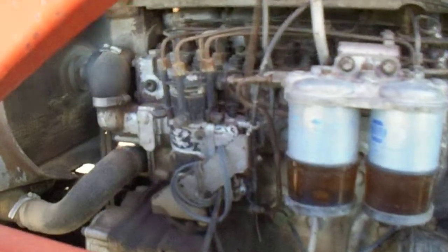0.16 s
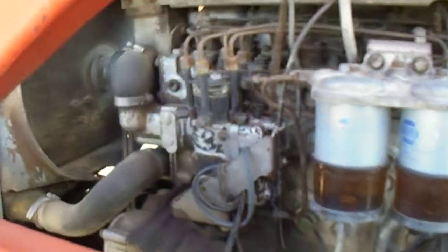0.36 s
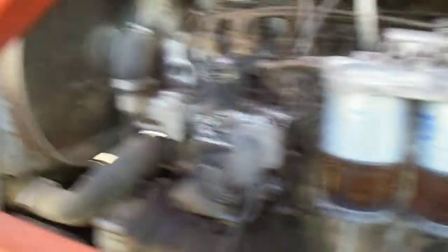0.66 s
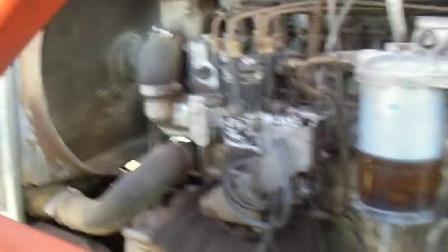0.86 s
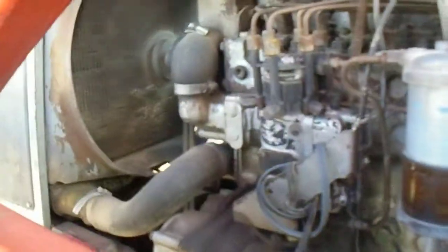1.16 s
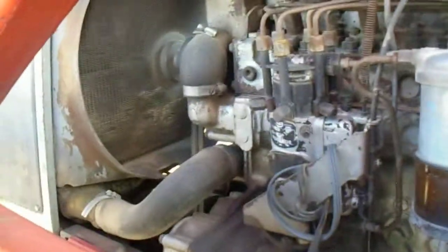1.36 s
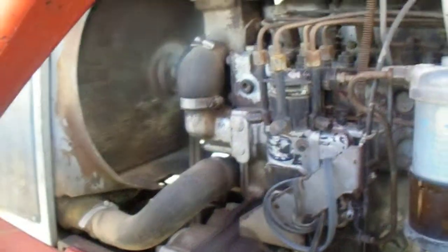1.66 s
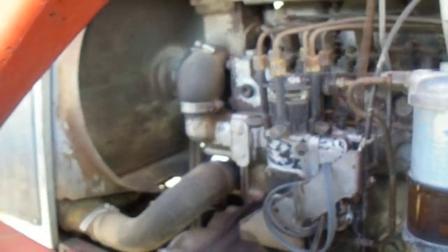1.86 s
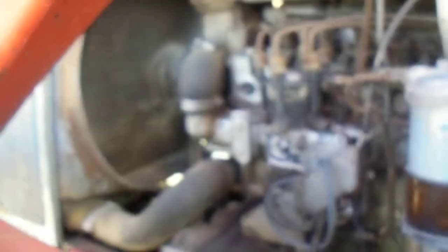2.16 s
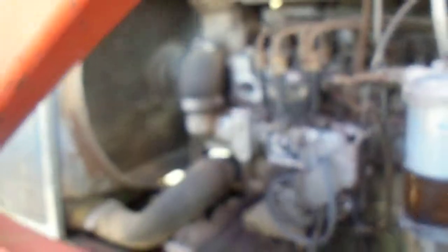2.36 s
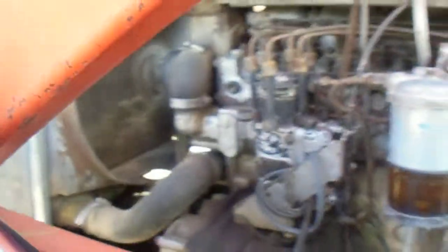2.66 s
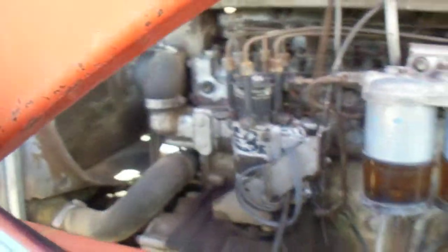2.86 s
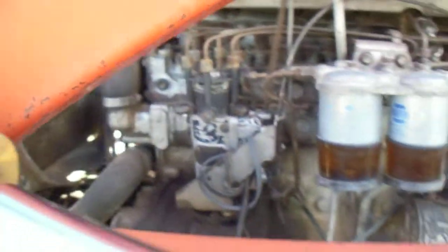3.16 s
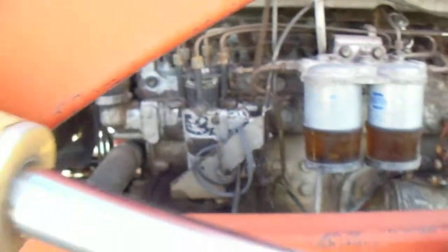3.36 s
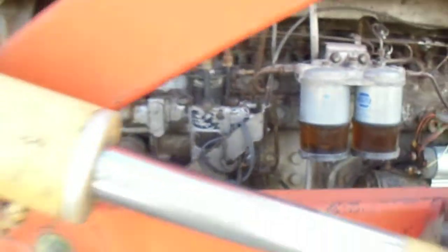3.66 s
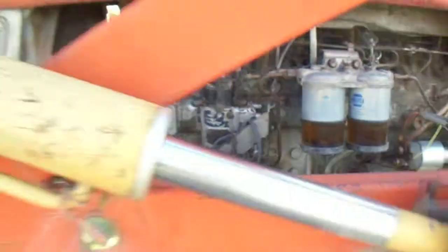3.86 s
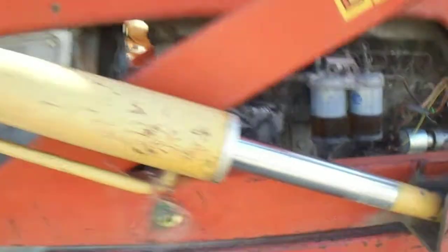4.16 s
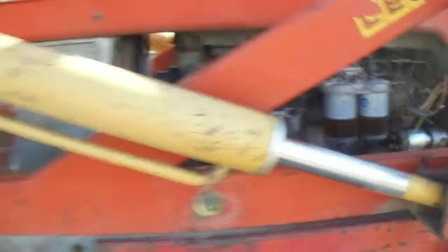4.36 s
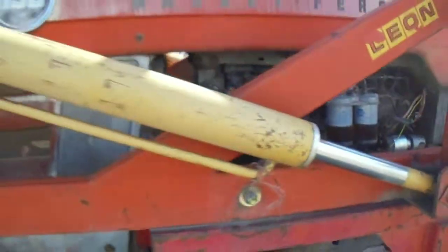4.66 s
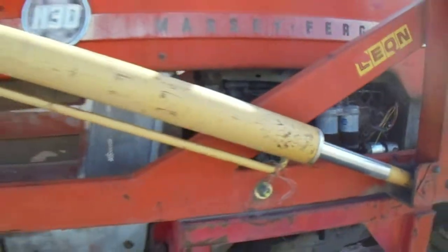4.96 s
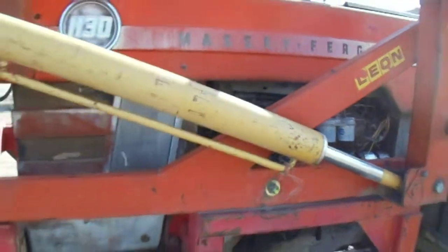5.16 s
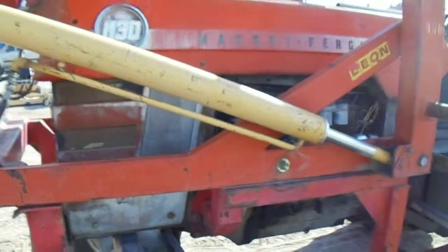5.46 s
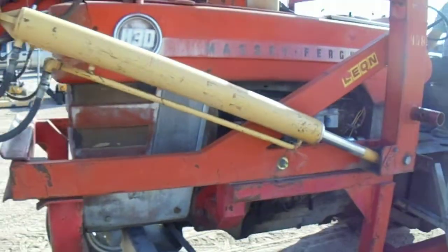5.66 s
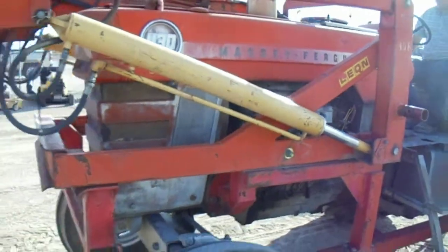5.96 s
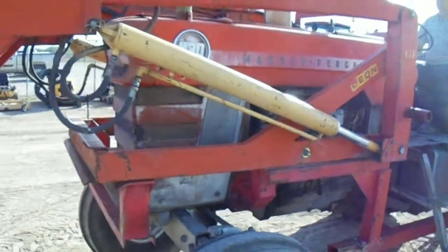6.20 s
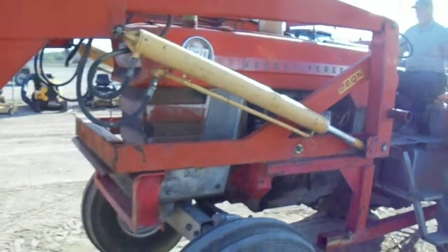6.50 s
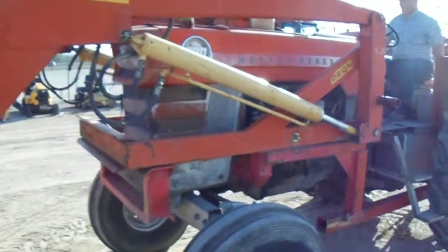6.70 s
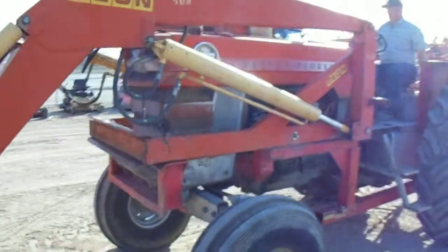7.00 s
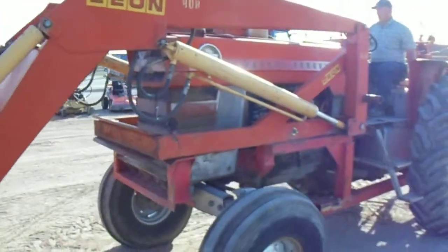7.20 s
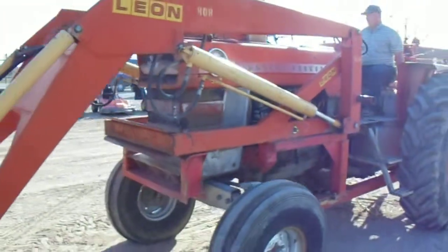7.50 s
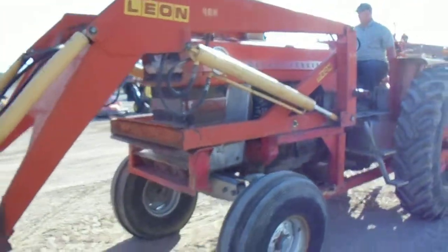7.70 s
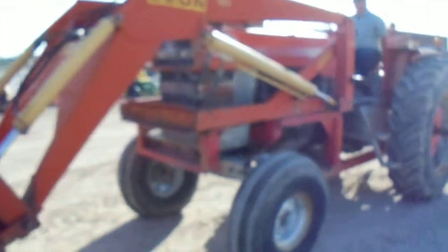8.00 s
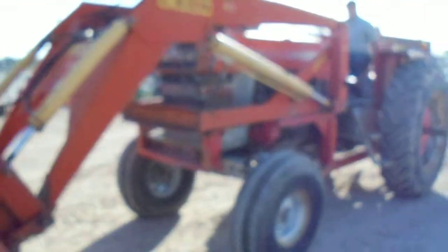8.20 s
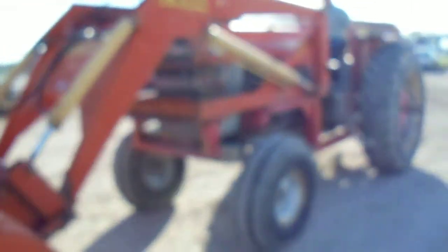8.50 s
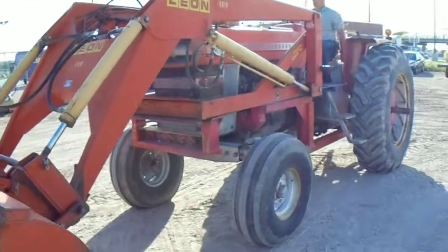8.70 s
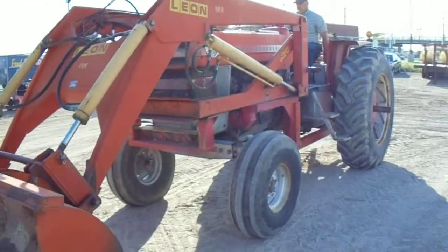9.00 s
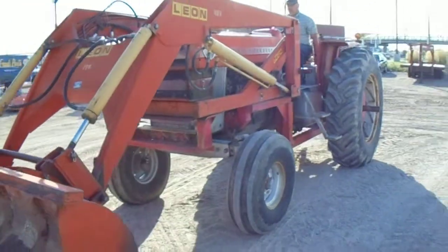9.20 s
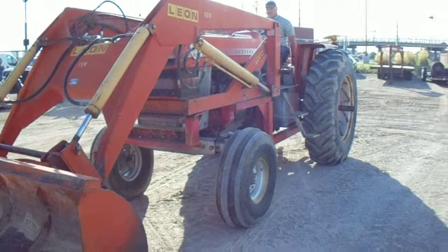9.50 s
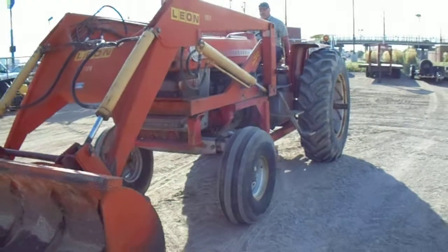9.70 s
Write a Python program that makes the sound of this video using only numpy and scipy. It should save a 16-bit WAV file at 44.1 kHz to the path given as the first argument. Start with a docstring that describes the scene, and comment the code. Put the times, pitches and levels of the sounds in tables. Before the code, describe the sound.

Outdoors on an open lot, an old diesel tractor keeps an even idle. At first the dull, band-limited microphone sits near the engine, catching hard rattling knocks and thin wavering whines. As it retreats past the loader arm, the pump hum swells and the rattle loses its edge. Wind rumbles and batters the microphone in bursts, briefly pulling the engine level down, before a calmer, more distant idle.

```python
"""Backing away from an idling tractor

A six-cylinder diesel idles outdoors while the microphone backs away from its open engine bay.
The clatter is noise that repeats with the crank, with rings on struck metal and a loose part.
The gear pump, shafts and gears hum and whine as wavering sine tones tied to the crank speed.
Wind is filtered random pushes, with short bursts and damped pops on the microphone.
An automatic gain control turns everything down after loud moments, then creeps back.
"""
import sys
import numpy as np
from scipy import signal
from scipy.io import wavfile
from scipy.ndimage import uniform_filter1d

SR = 44100
rng = np.random.default_rng(int(sys.argv[2]) if len(sys.argv) > 2 else 0)


def dump_mix(stems):
    """Bounce the given channels to the path in sys.argv[1] as a 16-bit WAV at rate SR."""
    frames = np.atleast_2d(stems).T  # one column per channel
    limited = np.clip(frames, -1, 1)  # hard clip at full scale
    pcm = np.round(limited * 32767).astype(np.int16)
    wavfile.write(sys.argv[1], SR, pcm)


N = 434385
SLOW_S = np.arange(0, N + 64, 64) / SR  # times at which slow controls are worked out [s]
TURN_HZ = 13.19  # crank turns a second

# Clatter level during the walk, before a small overall trim: (time [s], level [dB])
WALK_LEVEL = [(0, -26), (2.9, -25), (4.3, -26), (5.5, -27), (6.3, -29), (7.0, -29), (7.65, -28), (8.4, -29),
              (9.3, -29), (9.85, -31)]
# Listening place: (time [s], place [0 beside the block, 1 loader arm, 2 a step back, 3 clear of tractor])
WALK_PLACE = [(0, 0.71), (1.5, 0.5), (2.4, 0.43), (3.2, 0.4), (4.2, 1.44), (5, 1.8), (5.6, 2.47),
              (6.3, 2.26), (7.2, 2.33), (8.3, 2.2), (9, 3.5), (9.85, 3.4)]
# Clatter colour at each place; only the shape counts: (frequency [Hz], relative level [dB])
COLOUR_BESIDE = [(18, -43), (30, -17), (176, -7.5), (210, 1.5), (274, -21.5), (426, -7), (965, -11.5),
                 (1130, -9.5), (1230, -15), (1640, -15.5), (2440, -10), (2850, -15.5), (4150, -18),
                 (5060, -22), (5910, -41.5), (7680, -69), (13000, -120)]
COLOUR_AT_ARM = [(18, -45), (30, -19), (154, -25), (210, -15.5), (262, -15.5), (312, -8.5), (724, -8),
                 (944, -12.5), (1440, -9.5), (1530, -14.5), (1710, -13), (2090, -12.5), (4150, -18.5),
                 (5180, -24), (5910, -43), (7680, -82), (13000, -120)]
COLOUR_STEP_BACK = [(18, -40.5), (30, -9.5), (154, -20), (210, -7.5), (234, -6), (262, -14), (407, -10.5),
                    (508, -18.5), (740, -13), (1340, -18), (1680, -17), (2090, -17), (4150, -23),
                    (5180, -30), (5910, -48.5), (7680, -87), (13000, -120)]
COLOUR_CLEAR = [(18, -28), (30, 2.5), (113, -16), (140, -28), (245, -20.5), (334, -7.5), (430, -15),
                (530, -19.5), (680, -10), (1260, -13), (1750, -15), (2230, -15), (4150, -23), (5100, -29.5),
                (5910, -47.5), (7680, -76)]
# Ringing panels that lift the clatter colour: (frequency [Hz], width [Hz], lift [dB])
PANEL_PEAKS = [(670, 110, 1.5), (312, 120, 3.5), (835, 160, 1.5), (1136, 47, 3), (1655, 51, 7.5),
               (1770, 74, 5.5), (1911, 70, 7), (2478, 110, 3.5), (2990, 140, -0.5), (3656, 110, 3),
               (3970, 76, 3.5)]
# How much of the clatter repeats with the crank: (frequency [Hz], share of power [0 to 1])
REPEATING_SHARE = [(60, 0.85), (400, 0.56), (800, 0.44), (1700, .4), (2600, 0.72), (4000, 0.05),
                   (6000, .05)]
# Engine knocks in a two-turn cycle: (position [crank turns], relative level [dB])
KNOCK_TIMES = [(.09, 0), (.42, 5.5), (.77, 9), (0.931, -2.5), (1.09, -4.5), (1.42, 7), (1.77, 8),
               (1.932, -0.5)]
# Ringing tones of the casting: (frequency [Hz], relative level [dB], time to fall 60 dB [s])
CASTING_RINGS = [(1606, -5.5, 0.038), (1790, -4.5, 0.034), (2060, -8.5, .025), (2463, 2, 0.015),
                 (2650, 0, 0.032), (2714, 1, 0.032), (2860, -2.5, 0.065), (3780, -8.5, 0.019),
                 (3720, -18, 0.049), (4090, -4.5, 0.035), (4580, -7, 0.021)]
# Loose part being struck: (time [s], level [dB])
LOOSE_PART_LEVEL = [(0, -13), (.45, -13), (.9, -15), (1.6, -24), (2.4, -17.5), (3.2, -23.5), (4, -38)]

# Firing and shaft tones, shifted along the walk: (cycles a crank turn, relative level [dB])
SHAFT_TONES = [(3, -37), (6, -49.5), (8, -40.5), (9, -41), (10.5, -43), (11.5, -46), (12, -41.5), (14, -49),
               (17, -40.5), (32, -42.5), (33, -42)]
# Hum of the gear pump, 16 teeth a turn: (time [s], level [dB rms])
PUMP_LEVEL = [(0, -28), (.55, -33.5), (.8, -29.5), (1.4, -31.5), (2.2, -32.5), (3.2, -28), (3.7, -24),
              (4.4, -22), (4.6, -24), (5.55, -20.5), (5.75, -24), (6.5, -25.5), (6.72, -31), (6.88, -25),
              (7.35, -30), (7.85, -36), (8.15, -20), (8.4, -45), (9.85, -50)]
# Two tones that come and go: (time [s], 23 cycles a turn [dB rms], 51 cycles a turn [dB rms])
COMING_AND_GOING = [(0, -39, -40), (.35, -40, -31), (.9, -40.5, -39), (1.6, -41, -48), (4.6, -37, -49.5),
                    (6.7, -41.5, -51.5), (7.25, -33.5, -50), (7.7, -32, -50), (8.1, -34.5, -50),
                    (8.6, -45, -50), (9.85, -45, -49)]
# Whines strongest close up, shifted along the walk: (cycles a crank turn, relative level [dB])
CLOSE_WHINES = [(79.5, -41), (85, -51.5), (123, -43), (129, -45.5), (147, -41.5), (169, -48), (171, -50.5),
                (183, -42), (186, -41), (238, -44.5), (280, -46), (283, -40.5), (307, -46.5), (309, -44.5)]
# Gear whine levels: (time [s], near 87 teeth [dB], near 110 teeth [dB], 126 to 137 teeth [dB])
GEAR_LEVELS = [(0, -38, -55, -36), (.8, -38, -48, -42), (1.3, -42, -36, -37.5), (2.1, -38, -37, -44),
               (2.7, -37.5, -44, -42), (3.6, -46, -34.5, -38), (4.4, -56.5, -34.5, -40),
               (4.9, -53, -40.5, -41.5), (5.6, -41.5, -54, -38), (6.06, -44, -35, -35.5),
               (6.4, -52.5, -46, -32.5), (6.75, -47.5, -47.5, -37.5), (7.6, -47, -39, -31),
               (8.4, -46, -54.5, -46), (8.75, -45, -52, -35.5), (9.24, -40, -35.5, -38.5),
               (9.85, -49, -54, -39)]
# Gears: (group of teeth counts [per crank turn], level column of GEAR_LEVELS [from 0], added level [dB])
GEAR_TEETH = [((87,), 0, 0), ((110, 111), 1, 0), ((126,), 2, 1.6), ((127,), 2, -6.5), ((128,), 2, -.6),
              ((135, 136, 137), 2, -1.2)]

# Low wind rumble on the microphone: (time [s], level [dB])
BREEZE_LEVEL = [(0, -42), (.5, -32), (1.1, -37), (2.6, -43.5), (3.7, -32.5), (4.3, -34.5), (5, -21.5),
                (5.4, -38.5), (6.4, -25), (6.65, -26), (7.05, -21.5), (7.6, -31.5), (7.85, -23.5),
                (8.2, -18.5), (8.45, -33.5), (9.85, -39)]
# Low shoves of air: (peak time [s], level [dB])
AIR_SHOVES = [(.19, -33.5), (.46, -34), (.755, -30), (.93, -26), (1.62, -27), (1.73, -26), (1.89, -32),
              (2.09, -26), (2.17, -23.5), (2.41, -26.5), (2.99, -33), (3.37, -33), (3.7, -32.5),
              (4.42, -26), (4.57, -17.5), (4.64, -18), (4.719, -13.5), (5.46, -24), (5.62, -22.5),
              (5.98, -30), (6.251, -29), (6.59, -10), (6.86, -20), (7.19, -15.5), (7.28, -21),
              (7.68, -20.5), (7.82, -19), (8.03, -14.5), (8.12, -14.5), (8.21, -16.5), (8.64, -20),
              (8.75, -22.5), (9, -30), (9.57, -35), (9.85, -21)]
# Rough roar during gusts: (start [s], length [s], level [dB])
GUST_ROARS = [(4.5, 0.34, -23.5), (6.497, 0.14, -16), (6.84, .48, -24.5), (7.628, 0.069, -34.5),
              (7.763, 0.16, -12.5), (7.954, 0.405, -12.5)]
# Single pops on the microphone: (time [s], level [dB], frequency [Hz])
MIC_POPS = [(0.207, -16, 205), (0.46, -17, 210), (0.531, -12, 109), (0.7465, -12, 95), (0.751, -2, 422),
            (0.928, -18, 118), (1.638, -10, 215), (1.731, -8, 195), (2.11, -13, 213), (2.169, -18, 51.1),
            (2.428, -21, 205), (4.42, -8, 110), (5.618, -1.5, 207), (5.979, -11, 201), (6.804, -14, 102),
            (9.748, -10.5, 209)]
# A sharp tick on the casing: (time [s], level [dB], frequency [Hz])
CASING_TICK = [(0.7512, 0, 4770)]
# Gust flutter: (time [s], level [dB], length [s, before a factor of 0.73], top frequency [Hz])
FLUTTERS = [(4.513, -22.5, 0.01, 950), (4.584, -15, .013, 640), (4.638, -13, 0.016, 610),
            (4.685, -11, .004, 850), (4.718, -11.5, .008, 610), (4.803, -14, 0.0052, 470),
            (4.853, -14.5, 0.0075, 345), (5.625, -18, 0.0093, 870), (6.332, -16.5, 0.0076, 345),
            (6.51, -13.5, 0.0051, 450), (6.553, -9.5, 0.0056, 560), (6.6, -8, 0.009, 585),
            (6.652, -11, 0.0063, 430), (6.85, -9, 0.004, 310), (6.935, -14.5, .008, 410),
            (7.024, -11.5, 0.0082, 345), (7.128, -21, 0.011, 390), (7.189, -15.5, 0.006, 310),
            (7.674, -19.5, 0.0059, 450), (7.691, -12.5, 0.0054, 345), (7.792, -14.5, 0.026, 910),
            (7.831, -5.5, .006, 800), (7.885, -12.5, 0.016, 430), (7.946, -12.5, 0.006, 330),
            (7.999, -4, 0.0045, 450), (8.028, -2, 0.0048, 746), (8.045, -1, 0.0027, 830),
            (8.076, -6.5, 0.0064, 730), (8.091, -12, 0.0056, 560), (8.11, -5, .0062, 585),
            (8.142, -6.5, 0.014, 670), (8.163, -9, 0.0043, 360), (8.193, -5.5, 0.0037, 430),
            (8.205, -8.5, 0.0041, 345), (8.279, -15, 0.019, 510), (8.307, -16, 0.004, 610),
            (8.641, -13.5, 0.0037, 600), (8.752, -17, 0.0064, 310), (8.774, -18.5, 0.0052, 315)]

SHOVE_RISE_DB_S, SHOVE_FALL_DB_S = 330.5, 420.
GUST_RISE_S, GUST_SAG_DB, GUST_END_S = 0.013, -10.5, 0.033
# Gain control: the limit, the drop in dB a second for each dB over it, the recovery and the first gain
LIMIT_DB, BITE_PER_S, RECOVER_DB_S, START_DB = -15.5, 57.5, 8., -3
CEILING = .74  # the hardest peaks are cut flat here
MIC_EDGE_HZ, FINAL_EDGE_HZ = 6150, 16000


def gain_of(db):
    """Turns decibels into a multiplying factor."""
    return np.exp(np.asarray(db) * (np.log(10) / 20))


def evened(x):
    """Scales a sound to an average strength (rms) of 1."""
    return x / np.sqrt(np.mean(x ** 2) + 1e-20)


def read(points, hz):
    """Reads a table of frequencies, evenly spaced in pitch between points."""
    f, value = np.transpose(points)
    return np.interp(np.log(hz + 1), np.log(f + 1), value)


def curve(rows, t):
    """Reads each column of a time table at times t."""
    s, *columns = np.transpose(rows)
    return [np.interp(t, s, c) for c in columns]


def smooth(slow):
    """Fills in a slow control at every sample."""
    return np.interp(np.arange(N) / SR, SLOW_S, slow)


def band(x, lo_hz, hi_hz):
    """Keeps the sound between two frequencies, scaled to rms 1."""
    sos = signal.butter(2, [lo_hz, hi_hz], "bandpass", fs=SR, output="sos")
    return evened(signal.sosfilt(sos, x))


def drift(rate_hz):
    """Slow random wandering with an rms of about 1."""
    points = np.sqrt(3 / 2) * rng.standard_normal(1000)
    return np.interp(SLOW_S * rate_hz, np.arange(1000), points)


def strikes_at(turns, at, period):
    """One single-sample blow each period, at a given crank position."""
    return np.diff((turns - at) // period, prepend=(turns[0] - at) // period)


def repeating(turns, period, life):
    """Noise that repeats each period of crank turns, fading into a new pattern every life turns."""
    patterns = rng.standard_normal((60, 8192))
    place = (turns / period % 1 * round(period * SR / TURN_HZ)).astype(int)
    step = turns / life
    k = step.astype(int) % 59
    fade = step % 1 * np.pi / 2
    return np.cos(fade) * patterns[k, place] + np.sin(fade) * patterns[k + 1, place]


def clatter(turns):
    """Repeating and fresh noise, pulsed in the treble by knocks and coloured by the listening place."""
    alike = 0.92 * repeating(turns, period=1, life=14.5) + 0.3 * repeating(turns, period=2, life=13.9)
    fresh = rng.standard_normal(N)
    hz, t, z = signal.stft([alike, fresh], SR, nperseg=2048)
    share = np.clip(read(REPEATING_SHARE, hz), 0, 1)[:, None]
    mixed = np.sqrt(share) * z[0] + np.sqrt(1 - share) * z[1]
    steady = signal.istft(mixed, SR, nperseg=2048)[1][:N]

    pulses = sum(gain_of(db) * np.exp(-((turns - at) % 2) / 0.11) for at, db in KNOCK_TIMES)
    far = np.clip(curve(WALK_PLACE, np.arange(N) / SR)[0] / 2, 0, 1)
    pulsed = steady * (1 + 0.74 * (1 - 0.66 * far) * pulses)  # reflections blur the knocks with distance

    hz, t, z = signal.stft([steady, evened(pulsed)], SR, nperseg=1024, noverlap=768)
    rows_hz = hz[:, None]
    treble = 1 / (1 + (1900 / (rows_hz + 1)) ** 4)
    place = np.clip(curve(WALK_PLACE, t)[0], 0, 3)
    colours = (COLOUR_BESIDE, COLOUR_AT_ARM, COLOUR_STEP_BACK, COLOUR_CLEAR)
    # Blend the colours of the two nearest places
    colour_db = sum(np.clip(1 - abs(place - k), 0, 1) * read(c, hz)[:, None] for k, c in enumerate(colours))
    panels_db = sum(db / (1 + (2 * (rows_hz - f) / w) ** 2) for f, w, db in PANEL_PEAKS)
    colour = gain_of(colour_db + panels_db)
    # Even out the strength from 2 to 5 kHz, so that the walk table sets the level
    colour /= np.sqrt((colour[(hz > 2000) & (hz < 5000)] ** 2).sum(0) / len(hz))
    level = gain_of(curve(WALK_LEVEL, t)[0] - 1.03)
    shaped = ((1 - treble) * z[0] + treble * z[1]) * colour * level
    return signal.istft(shaped, SR, nperseg=1024, noverlap=768)[1][:N]


def knocks(turns):
    """Injector and valve blows ring the casting, much alike on every crank turn, loudest close up."""
    t, out = np.arange(2000) / SR, np.zeros(N)
    starts = rng.random((len(KNOCK_TIMES) // 2, len(CASTING_RINGS)))
    for (at, db), start in zip(KNOCK_TIMES, np.tile(starts, (2, 1))):  # both turns share ring phases
        strikes = strikes_at(turns, at, 2) * gain_of(db + 1.1 * rng.standard_normal(N))
        ring = sum(gain_of(g - 60 * t / t60) * np.sin(2 * np.pi * (hz * t + p))
                   for (hz, g, t60), p in zip(CASTING_RINGS, start))
        out += signal.oaconvolve(strikes, ring * np.minimum(t / 0.0011, 1))[:N]
    s = np.arange(N) / SR
    level_db = curve(WALK_LEVEL, s)[0] - 8.0 - 4.8 * curve(WALK_PLACE, s)[0]
    return evened(out) * gain_of(level_db)


def tappet(turns):
    """A loose part rings near 1.7 kHz, struck once hard and once softly each crank turn."""
    t = np.arange(1500) / SR
    tones = np.sin(2 * np.pi * 1720. * t) + 0.67 * np.sin(2 * np.pi * 1700.0 * t)
    ring = gain_of(-60 * t / 0.02) * np.minimum(t / 0.0027, 1) * tones
    strikes = sum(gain_of(db) * strikes_at(turns, at, 1) for at, db in ((.64, -1.0), (.16, -5.5)))
    level = gain_of(curve(LOOSE_PART_LEVEL, np.arange(N) / SR)[0])
    return signal.oaconvolve(strikes * level, ring)[:N]


def tone(order, db, waver_db=1.5, waver_hz=3., slip=0.084):
    """A sine at order cycles a crank turn, wavering in level and by slip cycles in phase."""
    cycles = order * TURN_HZ * SLOW_S + rng.random() + slip * drift(waver_hz)
    level = np.sqrt(2) * gain_of(db + waver_db * drift(waver_hz))
    return smooth(level) * np.sin(smooth(2 * np.pi * cycles))


def hums():
    """Firing, shafts, pump and gear teeth each make tones at fixed multiples of the crank speed."""
    walk_db, place = curve(WALK_LEVEL, SLOW_S)[0], curve(WALK_PLACE, SLOW_S)[0]
    gears_db = curve(GEAR_LEVELS, SLOW_S)
    out = sum(tone(order=k, db=db + 0.73 * (walk_db + 22.0), waver_db=2.0) for k, db in SHAFT_TONES)
    out += tone(order=16, db=curve(PUMP_LEVEL, SLOW_S)[0], waver_db=1.33, waver_hz=6., slip=.025)
    out += sum(tone(order=k, db=db) for k, db in zip((23, 51), curve(COMING_AND_GOING, SLOW_S)))
    close_db = walk_db + 27.5 - 6.0 * place
    out += sum(tone(order=k, db=db + close_db, waver_db=2.0, waver_hz=9., slip=0.17)
               for k, db in CLOSE_WHINES)
    for teeth, column, db in GEAR_TEETH:
        group = sum(tone(order=k, db=gears_db[column] + db, waver_db=2.0, waver_hz=3.6, slip=0.06)
                    for k in teeth)
        out += group / np.sqrt(len(teeth))
    return out


def eddies(per_s, spread_db):
    """Swirls of air strike the microphone port: scattered pushes of uneven size."""
    hits = (rng.random(N) < per_s / SR) * rng.standard_normal(N)
    return hits * smooth(gain_of(spread_db * drift(45.)))


def wind():
    """Swirling air gives a low rumble with sudden shoves, and a rough roar during gusts."""
    t = SLOW_S
    low = gain_of(curve(BREEZE_LEVEL, t)[0])
    for s, db in AIR_SHOVES:
        low += gain_of(db - np.maximum(SHOVE_RISE_DB_S * (s - t), SHOVE_FALL_DB_S * (t - s)))
    high = np.zeros(len(t))
    for s, length, db in GUST_ROARS:
        on = np.clip(np.minimum((t - s) / GUST_RISE_S, (s + length - t) / GUST_END_S), 0, 1)
        high += on * gain_of(db + GUST_SAG_DB * np.clip((t - s) / length, 0, 1))
    rumble = band(band(eddies(900., 1.6), 34.0, 210.), 13.0, 200.)
    roar = band(band(eddies(1500., 2.6), 160., 840.0), 100., 1700.)
    return smooth(low) * rumble + smooth(high) * roar


def pops():
    """Short swings of the microphone membrane, and a tick, die away within a few cycles."""
    out = np.zeros(N + 4000)
    for rows, fade_cycles in ((MIC_POPS, .8), (CASING_TICK, 3.)):
        for s, db, hz in rows:
            cycles = np.arange(4000) / SR * hz
            swing = np.sin(2 * np.pi * cycles) * np.exp(-cycles / fade_cycles)
            out[round(s * SR):][:4000] += -gain_of(db) * swing * 0.89
    return out[:N]


def thumps():
    """A gust flutters on the microphone port: short bursts of sharp, uneven pushes."""
    out = np.zeros(N)
    draws = gain_of(13.8 * rng.standard_normal((len(FLUTTERS), 4000)))  # few big pushes, many small
    for (s, db, length, top_hz), noise in zip(FLUTTERS, draws):
        shape = np.exp(-.5 * ((np.arange(4000) - 2000) / SR / (0.73 * length)) ** 2)
        burst = band(band(noise, 160.0, top_hz), 120.0, 3.0 * top_hz) * shape
        even = np.sqrt((shape ** 2).sum() / (burst ** 2).sum())
        out[round(s * SR) - 2000:][:4000] += gain_of(db) * burst * even
    return out


def levelled(x):
    """Gain control: loud moments pull the gain down fast, then it creeps back."""
    hop = 128  # samples between gain updates
    power_db = 10 * np.log10(uniform_filter1d(x ** 2, size=400)[::hop] + 1e-12)
    gain_db = START_DB + np.zeros(len(power_db) + 1)
    for k, p in enumerate(power_db):
        over = max(p + gain_db[k] - LIMIT_DB, 0)
        gain_db[k + 1] = min(0, gain_db[k] + (RECOVER_DB_S - BITE_PER_S * over) * hop / SR)
    return x * gain_of(np.interp(np.arange(N) / hop, np.arange(len(gain_db)), gain_db))


def low_passed(x, edge_hz):
    """Steeply removes everything above an edge frequency."""
    taps = signal.firwin(511, edge_hz, window=("kaiser", 9), fs=SR)
    return signal.oaconvolve(x, taps[None], "same")


def scene():
    """Adds engine, wind and microphone knocks at one microphone."""
    turns = TURN_HZ * np.arange(N) / SR
    engine = clatter(turns) + knocks(turns) + tappet(turns) + hums()
    return (engine + wind() + pops() + thumps())[None]


def record(dry):
    """Gain control, soft overload and microphone band limit, then a hard ceiling and final band limit."""
    soft = 0.95 * np.tanh(levelled(dry[0])[None] / 0.89)
    heard = low_passed(soft, MIC_EDGE_HZ)
    return low_passed(np.clip(heard, -CEILING, CEILING), FINAL_EDGE_HZ)


dry = scene()
out = record(dry)
dump_mix(out)
```